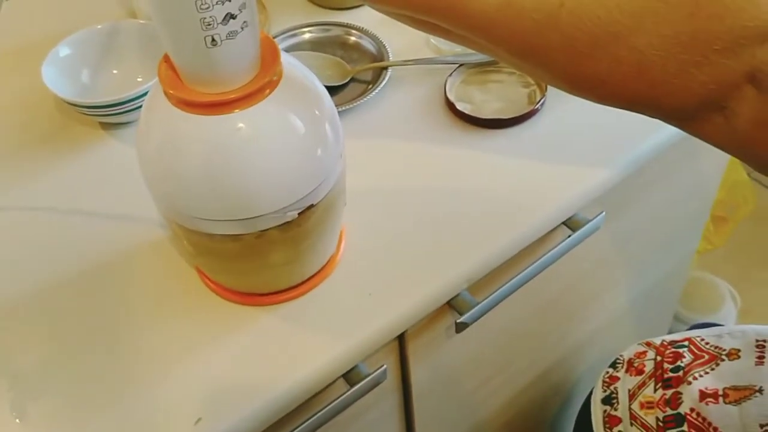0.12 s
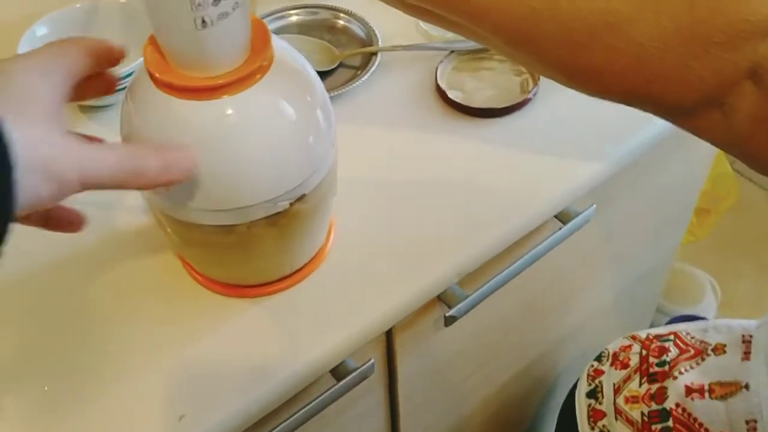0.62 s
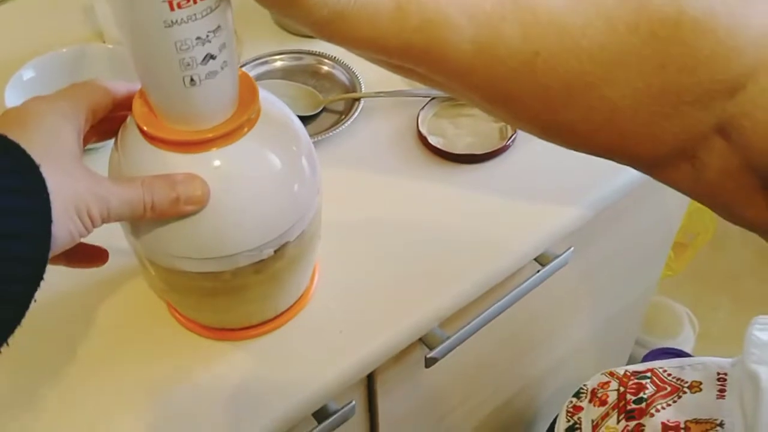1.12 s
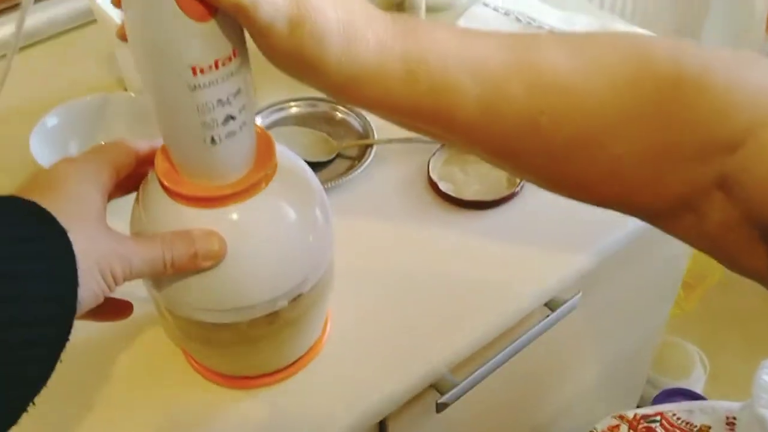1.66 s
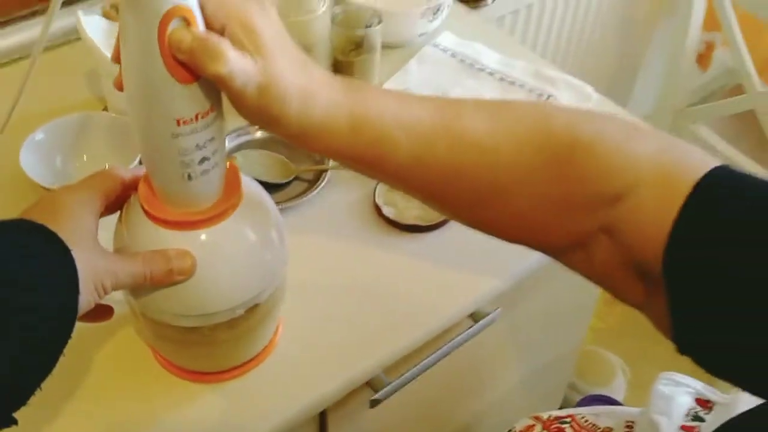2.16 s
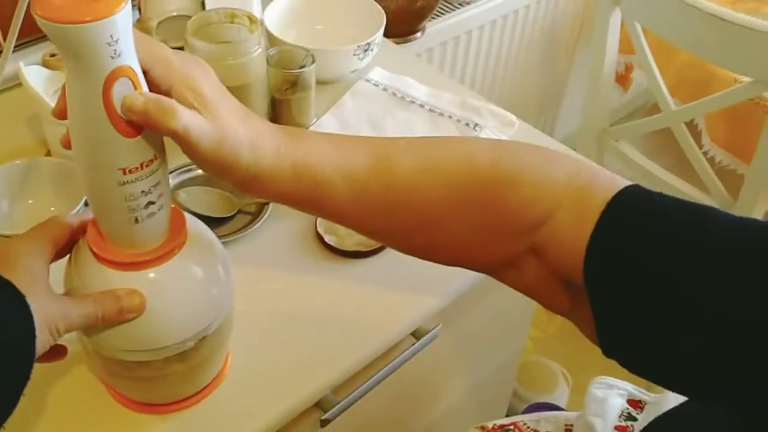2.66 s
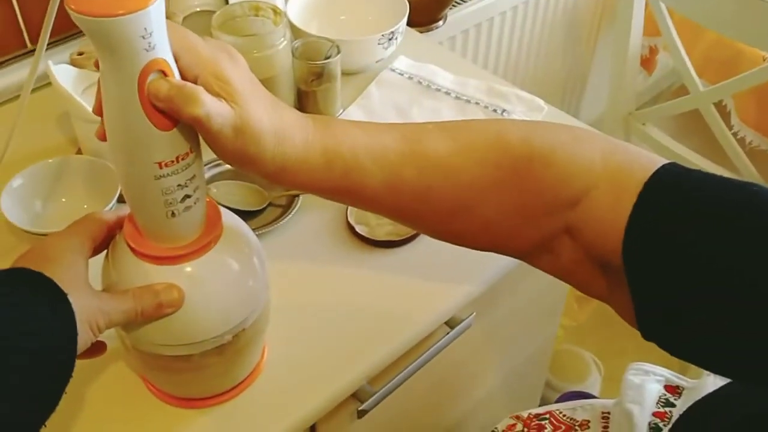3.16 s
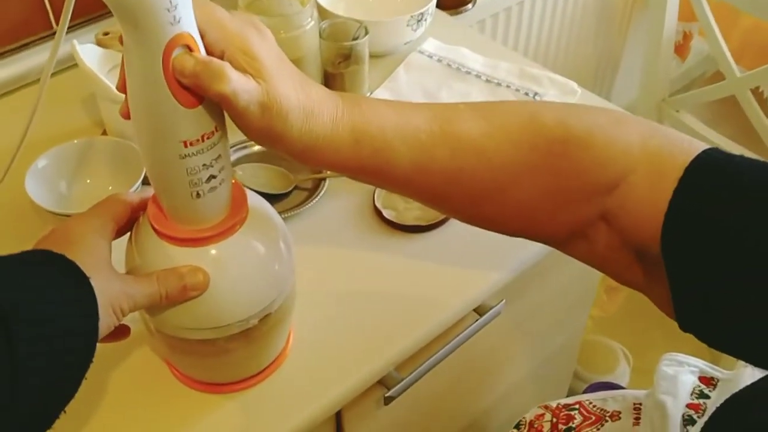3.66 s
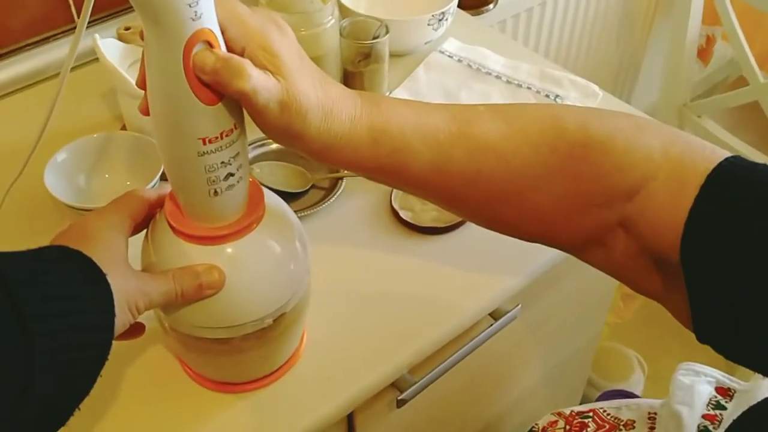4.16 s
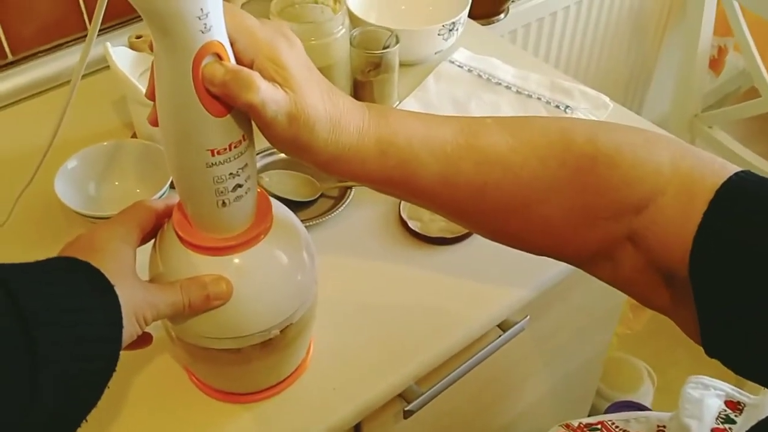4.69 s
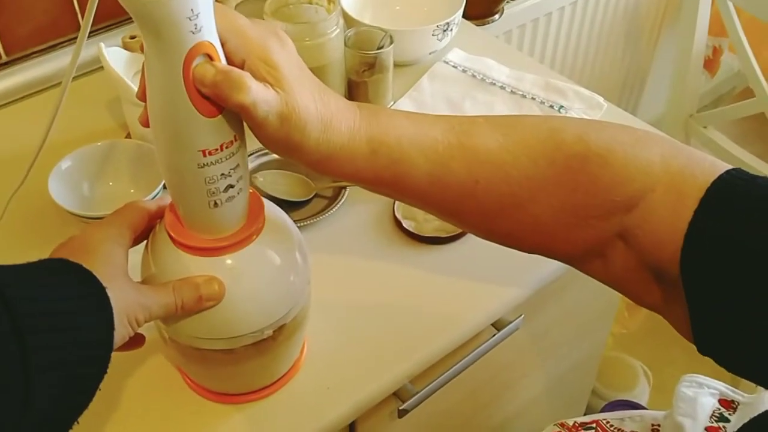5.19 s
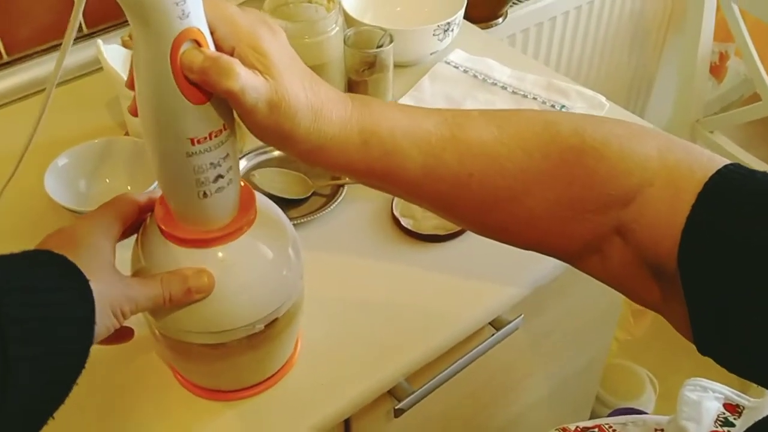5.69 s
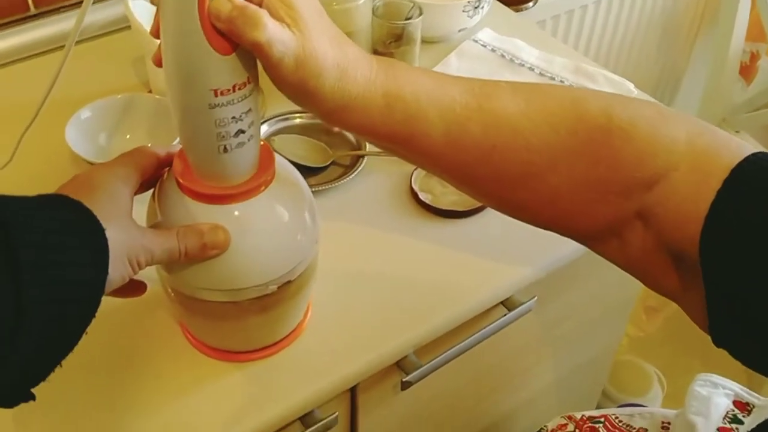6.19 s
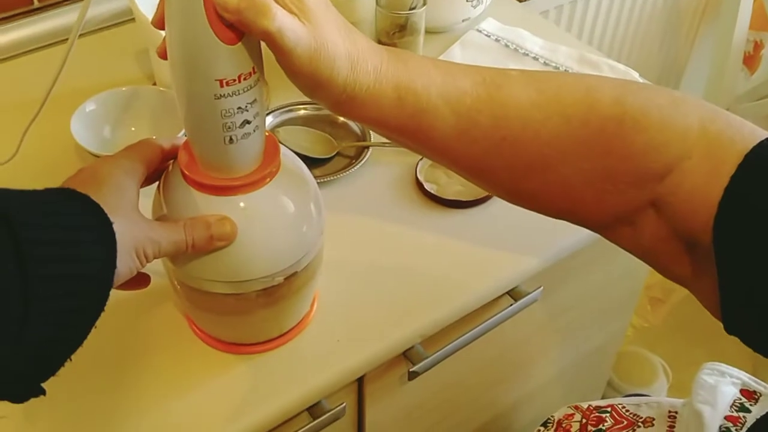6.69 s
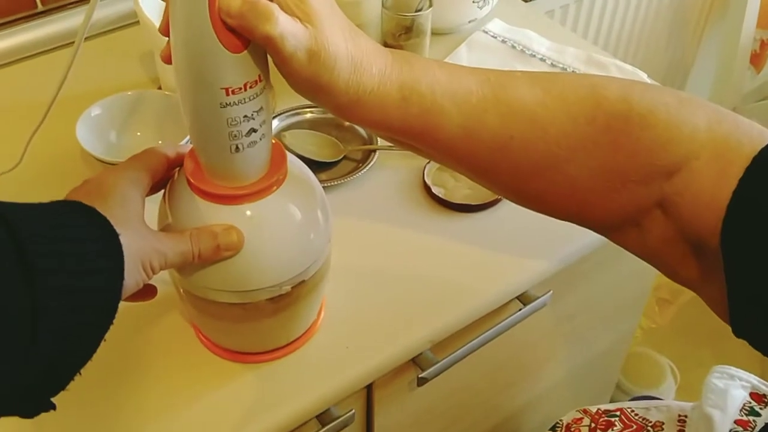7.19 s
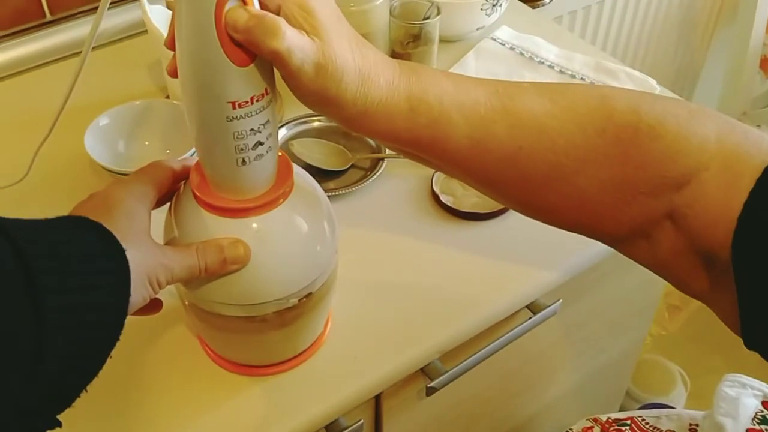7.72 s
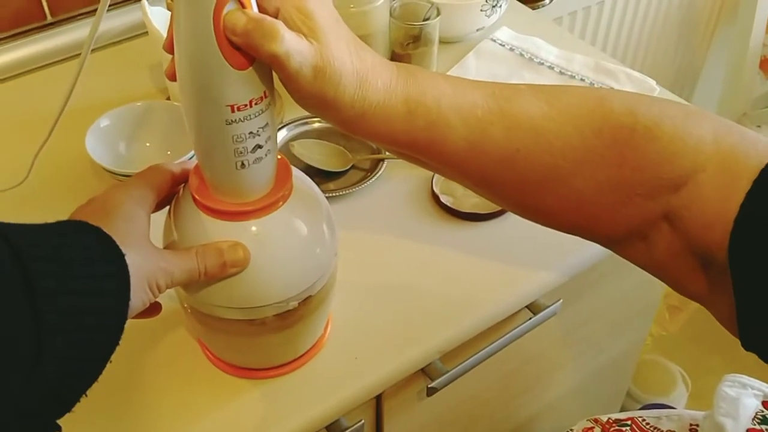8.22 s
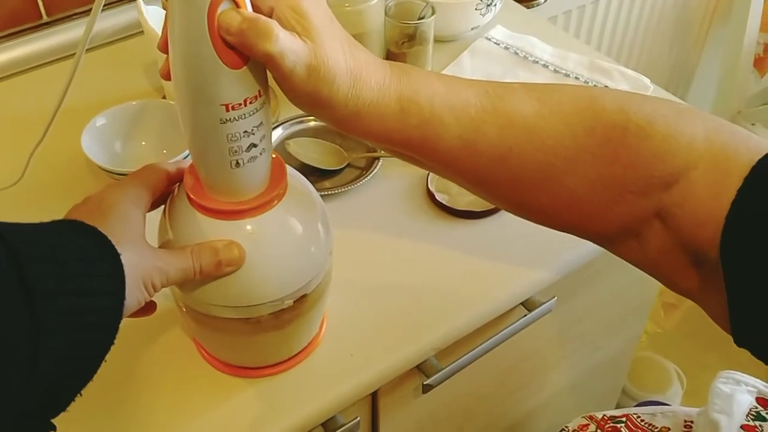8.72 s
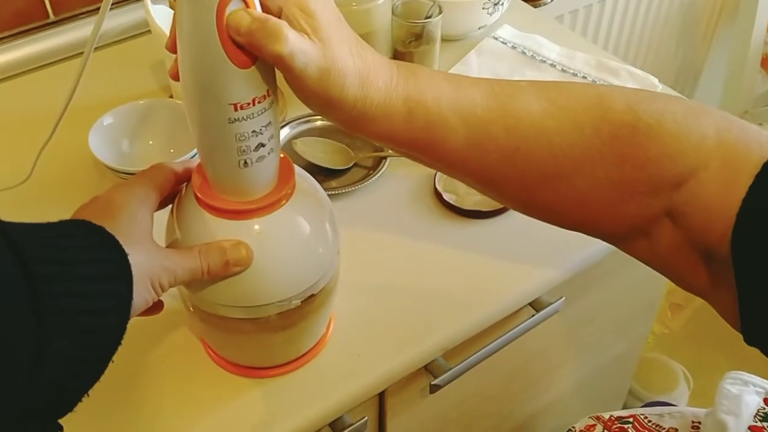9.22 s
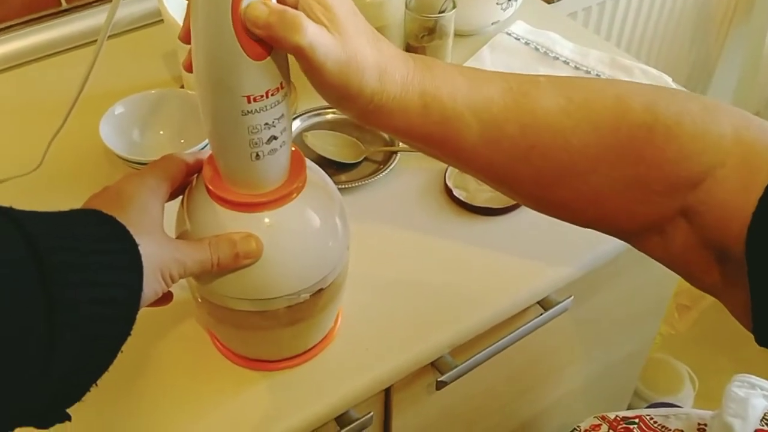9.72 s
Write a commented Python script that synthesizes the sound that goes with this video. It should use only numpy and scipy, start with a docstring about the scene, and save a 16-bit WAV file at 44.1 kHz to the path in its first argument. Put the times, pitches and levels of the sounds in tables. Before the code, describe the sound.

A hand blender with a chopper bowl grinds chickpeas in bursts, its whine and harsh rattle stopping and spinning up again in a hard kitchen.

```python
"""Hand blender chopping chickpeas in bursts

A hand blender drives a chopper bowl of chickpeas on a kitchen counter; it is already running at the start.
The motor whines on multiples of its shaft speed, and a 6:1 gear turns the blade, whose multiples shake the counter.
Peas and gear teeth rattle the plastic bowl as noise pulsing with the blade; churning paste rumbles below.
Later bursts spin up after a switch click; on release the speed sags and the motor stops.
The hard kitchen prolongs the sound as decaying noise, over quiet air and a faint mains hum."""
import sys
import numpy as np
from scipy import signal
from scipy.fft import rfft, irfft, next_fast_len
from scipy.io import wavfile
from scipy.ndimage import map_coordinates

SR = 44100
rng = np.random.default_rng(int(sys.argv[2]) if len(sys.argv) > 2 else 0)


def digitize_waveform(pressure):
    """Quantize a signal to 16-bit integers and store it at the path in sys.argv[1].

    Rows of a 2-D input are taken as channels; values are limited to [-1, 1].
    """
    field = np.atleast_2d(pressure).T
    bounded = np.clip(field, -1, 1)
    quanta = np.round(bounded * 32767).astype(np.int16)
    wavfile.write(sys.argv[1], SR, quanta)


def magnitude_from_level(level_db):
    """Linear magnitude for a level in decibels (20 dB per decade)."""
    exponent = np.asarray(level_db, float) / 20
    return 10 ** exponent


N = 434826
T = np.arange(N) / SR
GEAR_RATIO = 6  # shaft turns per blade turn

# Runs of the motor: press t/s, release t/s, stop t/s, lurch of the rattle before the stop level/dB,
# change of the low-speed whine while coasting level/dB
RUNS = [(-1, 2.315, 2.5, -6, -7), (2.943, 6.18, 6.445, 6, .5), (6.83, 9.17, 9.44, 3, 1.5),
        (9.775, 11, 11, 0, 0)]
# Motor with the button held: t/s, shaft speed f/Hz, nominal rattle level/dB
CRUISING = [(0, 296.6, -24.5), (.3, 297.2, -24.5), (.55, 297.5, -22.5), (.8, 298, -25), (1.1, 300, -25.5),
            (1.8, 301, -24), (2.3, 299.2, -24.5), (3.3, 296, -24.5), (3.5, 296, -26), (3.75, 298.3, -23.5),
            (4.05, 302.8, -25), (5.75, 306.7, -24.5), (6.18, 304.6, -25.5), (7.27, 301.8, -25),
            (8.05, 303, -25), (8.75, 302, -25.5), (9.16, 301.8, -24.5)]
# Every start hesitates once, then catches: t/s after the press, share of full speed [1]
START_CURVE = [(0, .4), (.03, .51), (.07, .6), (.15, .66), (.2, .83), (.245, .95), (.33, .98), (.44, 1)]
# Laws of speed: share of full speed [1], rattle change level/dB, sizzle over rattle level/dB,
# low-speed part of order 8 nominal level/dB, change of order 9 level/dB
SPEED_LAWS = [(.4, -11, -13, -62, -38), (.52, -5, -7, -50, -30), (.6, -4.5, -3, -33, -19),
              (.7, -5, -4, -31, -15), (.83, -2.5, -1, -30, -13), (.93, 1, -1, -28, -11),
              (.975, .01, -.5, -29, -2), (.995, .01, -.5, -50, .01)]
# Gear mesh, nominal at full speed: shaft order [1], on whole peas level/dB, on paste level/dB
GEAR_MESH = [(8, -40, -38.5), (9, -56, -34)]
# Spells in which order 8 sings out: start t/s, length t/s, nominal level/dB
SINGING_SPELLS = [(-.1, .5, -31), (.72, .36, -30), (1.3, .3, -39), (1.7, .3, -39), (3.13, .3, -31.5),
                  (7.03, .2, -36)]
# Casing resonance that lifts orders 15 and 16: centre f/Hz, width f/Hz, nominal level/dB over rattle
CASING = (4470, 590, -9)
# Weaker motor orders: shaft order [1], nominal level/dB when the rattle stands at -24 dB
WEAK_ORDERS = [(3, -56), (4, -50.5), (12, -47), (15.2, -43)]
# Narrow bowl modes kept ringing by the peas: f/Hz, nominal level/dB when the rattle stands at -24 dB
BOWL_MODES = [(1836, -50.5), (2195, -44.5)]
# Pulsing of the rattle: blade multiple [1], depth [0-1]
BLADE_THROB = [(1, 0.18), (2, 0.22), (3, 0.2), (4, 0.1), (6, 0.2)]
# Rattle through bowl and casing at full speed: f/Hz, relative level/dB per Hz
BOWL_RESPONSE = [(210, -61), (350, -20.5), (823, -14.5), (1500, -7.5), (1820, -3.5), (2030, -4.5),
                 (2450, 0), (3320, -8.5), (4550, -2.5), (5680, -19), (7800, -7), (11400, -22), (15400, -16)]
# The duller rattle at low speed: f/Hz, relative level/dB per Hz
SLOW_RESPONSE = [(210, -46.5), (350, -22.5), (1180, -10.5), (1790, -1.5), (2060, -10.5), (4480, -6.5),
                 (5680, -12.5), (15400, -19)]
# Churning paste: f/Hz, relative level/dB per Hz
PASTE_SPECTRUM = [(18, -49.5), (30, -3), (145, -7), (259, 4.5), (395, -22), (500, -7.5), (650, 4.5),
                  (1100, -120)]
# The bowl shuddering on the counter at low speed: f/Hz, relative level/dB per Hz
SHUDDER_SPECTRUM = [(40, -30), (70, -6), (110, 0), (170, -3), (300, -8), (450, -40)]
# Blade multiples in the counter at full speed: multiple [1], on whole peas level/dB, on paste level/dB,
# surge after a start level/dB
COUNTER_DRONE = [(3, -53.5, -60, 9), (5, -74, -52.5, .5), (6, -62, -60, 12), (7, -53, -76, .5)]
# Fluttering blade multiples without surges or spells, at full speed: multiple [1], nominal level/dB
FLUTTERING_BLADE = [(2, -61), (4, -62)]
# Spells in which a blade multiple booms: start t/s, length t/s, multiple [1], nominal level/dB
BOOMS = [(1.5, .9, 3, -59), (3.1, .9, 3, -59), (1.5, .9, 6, -53.5), (1.2, .4, 5, -58), (7.6, 1.1, 5, -63)]
# Decay of the room: f/Hz, time to fall by 60 dB t/s
KITCHEN_DECAY = [(150, 0.89), (1500, 0.55), (4000, 0.42), (9000, 0.39), (15000, 0.38)]
# Quiet air: f/Hz, relative level/dB per Hz
AIR_SPECTRUM = [(25, -25), (66, -2.5), (103, -14), (214, -5.5), (482, -17), (1300, -21.5), (3000, -30),
                (5000, -44.5), (15700, -45)]
# Mains hum: f/Hz, nominal level/dB
MAINS_HUM = [(50, -66.5), (100, -64), (200, -60.5)]
# Switch: t/s, nominal crack peak level/dB, knock over crack level/dB
SWITCH_CLICKS = [(2.5114, -26, -7.5), (2.6244, -42, -14.5), (2.9217, -25, -7.5), (6.823, -34, -2.5),
                 (9.7663, -25, 1)]
# Handle body: f/Hz, relative level/dB per Hz
HANDLE_SPECTRUM = [(400, -26), (1000, -2.5), (1600, -3.5), (2500, -12), (6000, -28)]


def unit(x):
    """Normalisation to unit rms."""
    return x / np.sqrt(np.mean(x ** 2) + 1e-20)


def along(points, hz):
    """Interpolation of (f/Hz, value) points on a logarithmic frequency axis."""
    f, value = np.transpose(points)
    return np.interp(np.log(hz + 1), np.log(f + 1), value)


def curves(rows):
    """Linear interpolation in time: one curve for each column after t/s."""
    s, *columns = np.transpose(rows)
    return [np.interp(T, s, column) for column in columns]


def wobble(rate):
    """Band-limited random fluctuation: a smooth curve through `rate` random knots a second."""
    knots = rng.standard_normal(int(N * rate / SR) + 4)
    return map_coordinates(knots, [T * rate])


def filtered(x, response):
    """Linear filtering: the spectrum is multiplied by a function of frequency."""
    size = next_fast_len(N + 8192)
    hz = np.fft.rfftfreq(size, 1 / SR)
    return irfft(rfft(x, size) * response(hz), size)[:N]


def coloured(x, spectrum):
    """Spectral shaping by a (f/Hz, level/dB) table, normalised to unit rms."""
    return unit(filtered(x, lambda hz: magnitude_from_level(along(spectrum, hz))))


def tone(turns, db, flutter_db, flutter_rate, slip):
    """A sinusoid of nominal rms db whose level flutters and whose phase (slip in rad) wanders."""
    phase = 2 * np.pi * turns + slip * wobble(flutter_rate) + rng.uniform(0, 2 * np.pi)
    level = magnitude_from_level(db + flutter_db * wobble(flutter_rate))
    return np.sqrt(2) * level * np.sin(phase)


def rough(turns, db, flutter_rate):
    """Narrow-band noise: a carrier modulated in quadrature by two random fluctuations."""
    in_phase = wobble(flutter_rate) * np.sin(2 * np.pi * turns)
    quadrature = wobble(flutter_rate) * np.cos(2 * np.pi * turns)
    return magnitude_from_level(db) * (in_phase + quadrature)


def spells(rows):
    """Trapezoidal gain of sounds that come, hold and go: rows of (start t/s, length t/s, level/dB)."""
    edge_s = .09
    return sum(magnitude_from_level(db) * np.clip(np.minimum(T - s, s + length - T) / edge_s, 0, 1)
               for s, length, db in rows)


def speed_share():
    """Inertia and drag set the share of full speed; also time since the press and run-down levels in dB."""
    sag_to, sag_s, coast_per_s, least_share = .8, .048, .44, .4  # share, time constant, share lost a second
    lurch_lead_s, lurch_s = .09, .025
    dying_db, dying_s = -18, .08
    current = np.searchsorted([run[0] for run in RUNS], T, "right") - 1
    press, release, stop, lurch, whine_db = np.transpose(RUNS)[:, current]
    coasting = np.maximum(T - release, 0)
    sag = sag_to + (1 - sag_to) * np.exp(-coasting / sag_s) - coast_per_s * coasting
    share = np.interp(T - press, *np.transpose(START_CURVE)) * np.maximum(sag, least_share)
    # a last jolt of the load, then whine and treble die before the stop
    lurch_db = lurch * np.exp(-((T - stop + lurch_lead_s) / lurch_s) ** 2)
    fade_db = dying_db * np.clip(1 + (T - stop) / dying_s, 0, 1)
    return share, T - press, lurch_db, fade_db, whine_db * (coasting > 0)


def mesh_levels(fine, slow_db, loss_db):
    """Mesh excitation by load: order 8 sings at low speed and in spells, order 9 grows as the paste fines."""
    eighth_db, ninth_db = [whole + (paste - whole) * fine for _, whole, paste in GEAR_MESH]
    full = np.clip(1 + loss_db / 10, 0, 1)
    eighth_gain = full * magnitude_from_level(eighth_db) + spells(SINGING_SPELLS) + magnitude_from_level(slow_db)
    return 20 * np.log10(eighth_gain), ninth_db + loss_db


def whine(shaft, speed_hz, slack, rattle_db, eighth_db, ninth_db):
    """Gear-mesh harmonics, rougher when slack; orders 15 and 16 sweep through the casing resonance."""
    core = tone(8 * shaft, eighth_db - 9 * slack, 1.5, 20, .3)
    core += tone(9 * shaft, ninth_db - 1, 2.5, 35, .5)
    skirt = rough(8 * shaft, eighth_db - 13 + 14 * slack, 320)
    skirt += rough(9 * shaft, ninth_db - 8, 120)
    centre_hz, width_hz, casing_db = CASING
    upper = 0
    for order in (15, 16):
        resonance = 1 / np.hypot(1, 2 * (order * speed_hz - centre_hz) / width_hz)
        upper = upper + resonance * rough(order * shaft, rattle_db + casing_db, 280)
    upper += slack * rough(16 * shaft, eighth_db - 8, 260)  # octave of the mesh tone, following it
    weak = sum(rough(order * shaft, db + rattle_db + 24, 30) for order, db in WEAK_ORDERS)
    weak += sum(rough(hz * T, db + rattle_db + 24, 25) for hz, db in BOWL_MODES)
    return core + skirt, upper + weak


def rattle(blade, slack, level_db, sizzle_db):
    """Dense impacts of peas and gear teeth over friction noise, modulated by the blade, duller when slow."""
    throb = 1 + sum(depth * np.cos(2 * np.pi * k * blade + 1.56 * wobble(3)) for k, depth in BLADE_THROB)
    knocks_per_s = 1500
    knock_size = magnitude_from_level(np.minimum(3 * rng.exponential(size=N), 7))
    knocks = rng.standard_normal(N) * knock_size * (rng.random(N) < knocks_per_s / SR)
    drive = (unit(knocks) * .4 + rng.standard_normal(N)) * throb
    drive *= magnitude_from_level(0.71 * wobble(6) + 0.6 * wobble(25) + 1.06 * wobble(70))  # the load of peas comes in lumps
    fast, slow = coloured(drive, BOWL_RESPONSE), coloured(drive, SLOW_RESPONSE)

    def below_sizzle(x):
        """Steep low-pass that parts body from sizzle."""
        return filtered(x, lambda hz: 1 / (1 + (hz / 5800) ** 16))

    fast_body = below_sizzle(fast)
    body = (1 - slack) * unit(fast_body) + slack * unit(below_sizzle(slow))
    sizzle = unit(fast - fast_body) * magnitude_from_level(sizzle_db + 0.87 * wobble(30))
    return magnitude_from_level(level_db - 2.0) * (body + sizzle)


def churn(slack, rattle_db):
    """Broadband low-frequency noise of churning paste, with the bowl's shudder at low speed."""
    paste = magnitude_from_level(rattle_db - 28.5 + 9.8 * slack) * coloured(rng.standard_normal(N), PASTE_SPECTRUM)
    shudder = slack * magnitude_from_level(rattle_db - 26) * coloured(rng.standard_normal(N), SHUDDER_SPECTRUM)
    return paste + shudder


def counter(blade, fine, since):
    """Forced vibration at blade multiples: shifting as the paste fines, surging at starts, booming in spells."""
    surge_hold_s, surge_s = .25, .4
    surge = np.exp(-np.maximum(since - surge_hold_s, 0) / surge_s)
    drone = 0
    for k, whole, paste, surge_db in COUNTER_DRONE:
        booms = [(s, length, db) for s, length, multiple, db in BOOMS if round(multiple) == round(k)]
        gain = magnitude_from_level(whole + (paste - whole) * fine + surge_db * surge) + spells(booms)
        drone = drone + gain * tone(round(k) * blade, 0, 1.5, 6, .3)
    return drone + sum(tone(round(k) * blade, db, 2.5, 12, 0.6) for k, db in FLUTTERING_BLADE)


def blender():
    """Sources governed by one shaft speed, silent between bursts: (tones, noise)."""
    cruise_hz, cruise_db = curves(CRUISING)
    share, since, lurch_db, fade_db, whine_db = speed_share()
    at, *laws = np.transpose(SPEED_LAWS)
    law_db, sizzle_db, slow_db, loss_db = [np.interp(share, at, law) for law in laws]
    speed_hz = cruise_hz * share
    rattle_db = cruise_db + law_db + lurch_db + .3 * fade_db
    sizzle_db = sizzle_db + fade_db
    fining_s = 2.5  # time constant of peas turning to paste
    fine = 1 - np.exp(-T / fining_s)
    eighth_db, ninth_db = mesh_levels(fine, slow_db + fade_db + whine_db, loss_db)
    shaft = np.cumsum(speed_hz) / SR  # turns
    blade = shaft / GEAR_RATIO
    slack = np.clip((290 - speed_hz) / 50, 0, 1)  # 0 at full speed, up to 1 at low speed
    core, gears = whine(shaft, speed_hz, slack, rattle_db, eighth_db, ninth_db)
    tones = core + counter(blade, fine, since) * magnitude_from_level(-12 * slack)
    noise = rattle(blade, slack, rattle_db, sizzle_db) + gears + churn(slack, rattle_db)
    onset_s, ending_s = 0.0013, 0.035
    running = sum(np.clip((T - on) / onset_s, 0, 1) * np.clip((off - T) / ending_s, 0, 1)
                  for on, _, off, *_ in RUNS)
    return running * tones, running * noise


def kitchen(x):
    """Reverberation as noise whose decay time depends on frequency."""
    # the echo pattern is renewed every third of a second so no single pattern colours the tones
    hop = SR // 3
    delay = 200  # samples
    out = np.zeros(N + 3 * SR)
    padded = np.pad(x, (hop, 2 * hop), "reflect")  # the room is already sounding at the start
    window = np.sin(np.pi * np.arange(2 * hop) / (2 * hop))
    for start in range(0, N + hop, hop):
        hz, t, z = signal.stft(rng.standard_normal(SR), SR, nperseg=256)
        decay = magnitude_from_level(-60 * t / along(KITCHEN_DECAY, hz)[:, None])
        tail = signal.istft(z * decay, SR, nperseg=256)[1]
        piece = padded[start:start + 2 * hop] * window
        answer = signal.fftconvolve(piece, tail / np.linalg.norm(tail))
        out[start:start + len(answer)] += answer
    return out[hop - delay:][:N]


def room_tone():
    """Stationary background: shaped noise of quiet air and harmonics of the mains."""
    air_db = -57
    hum = sum(tone(hz * T, db, 1.5, 6.3, .2) for hz, db in MAINS_HUM)
    return hum + magnitude_from_level(air_db) * coloured(rng.standard_normal(N), AIR_SPECTRUM)


def switch():
    """Impulsive excitation: a sharp crack of the button and a short dull knock through the handle."""
    crack_t60_s, knock_t60_s, knock_rise_s = .012, .08, 0.00052
    crack, knock = np.zeros(N + SR), np.zeros(N + SR)
    t = np.arange(SR // 10) / SR
    for s, db, knock_db in SWITCH_CLICKS:
        span = slice(round(s * SR), round(s * SR) + len(t))
        crack[span] += magnitude_from_level(db - 14.5 - 60 * t / crack_t60_s)
        rise = 1 - np.exp(-t / knock_rise_s)
        knock[span] += magnitude_from_level(db + knock_db - 2 - 60 * t / knock_t60_s) * rise
    bright = np.diff(rng.standard_normal(N + 1))
    return crack[:N] * bright + knock[:N] * coloured(rng.standard_normal(N), HANDLE_SPECTRUM)


def scene():
    """Superposition of direct sound, reverberation and background at one microphone feeding both channels."""
    tones, noise = blender()
    noise = noise + switch()
    # the tones are sent to the room at a lower level, so they leave weaker tails
    echoes = magnitude_from_level(-2.5) * kitchen(noise + magnitude_from_level(-8) * tones)
    return np.tile(tones + noise + echoes + room_tone(), (2, 1))


def low_pass(x):
    """Removes everything above the highest recorded frequency."""
    return signal.sosfilt(signal.butter(12, 16950, fs=SR, output="sos"), x)


def record(dry):
    """Soft saturation of the microphone amplifier, then a sharp low-pass."""
    ceiling, top_hz = .45, 15730  # ceiling: peaks near this size are rounded off
    rounded = dry / (1 + np.abs(dry / ceiling) ** 4) ** .25
    mix = np.array([filtered(channel, lambda hz: hz < top_hz) for channel in rounded])
    return low_pass(mix)


dry = scene()
out = record(dry)
digitize_waveform(out)
```